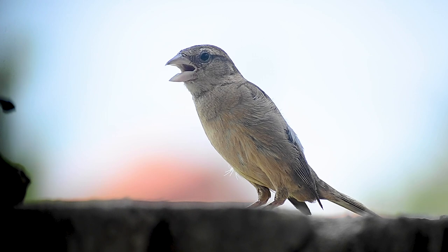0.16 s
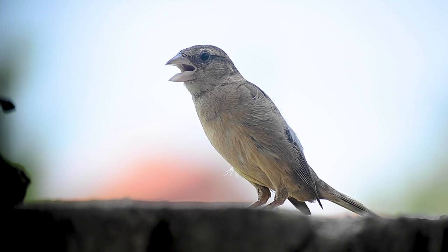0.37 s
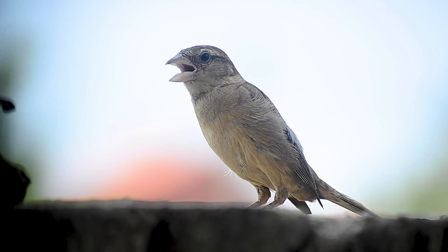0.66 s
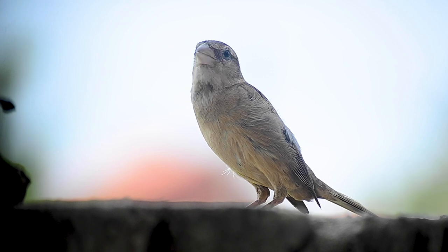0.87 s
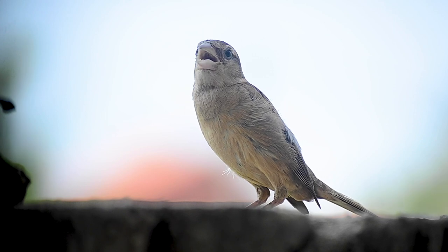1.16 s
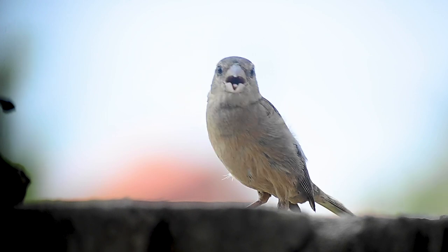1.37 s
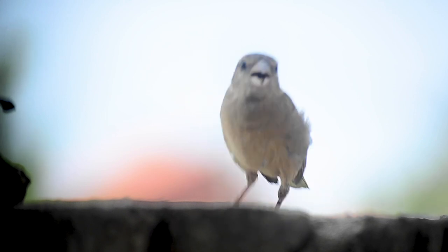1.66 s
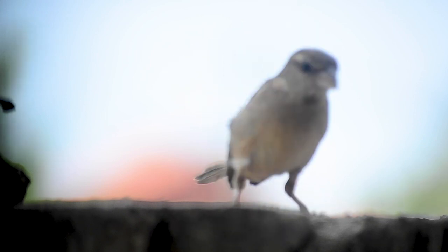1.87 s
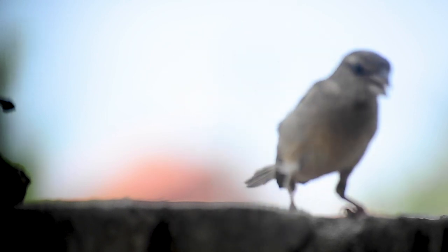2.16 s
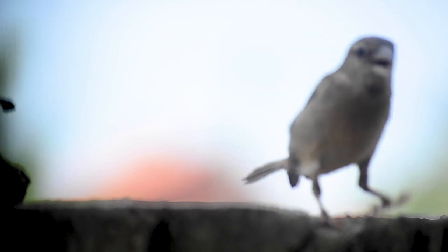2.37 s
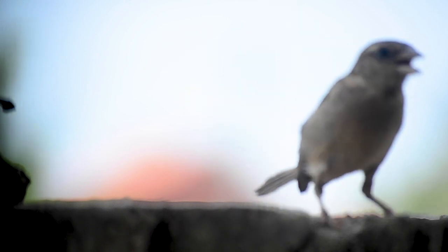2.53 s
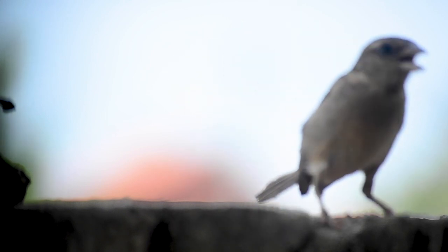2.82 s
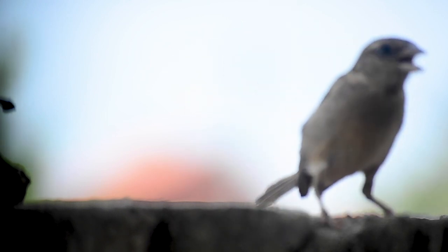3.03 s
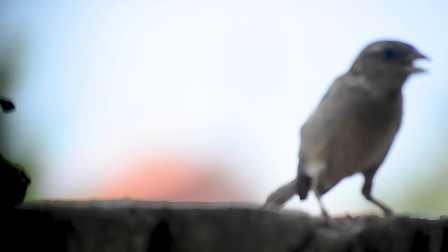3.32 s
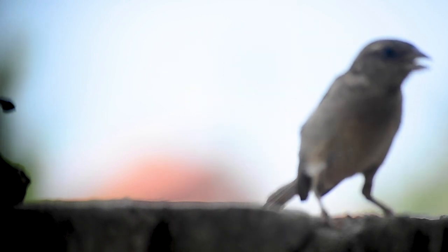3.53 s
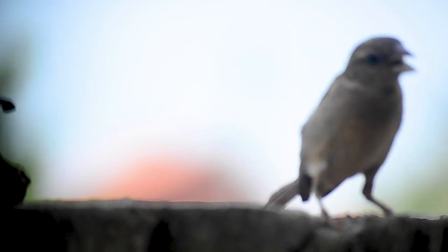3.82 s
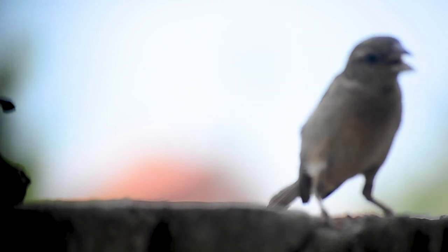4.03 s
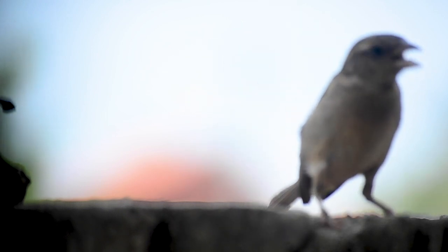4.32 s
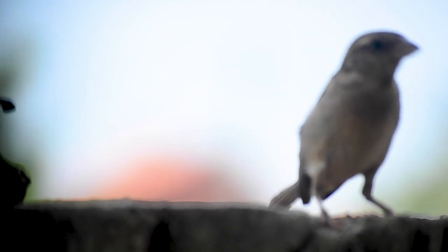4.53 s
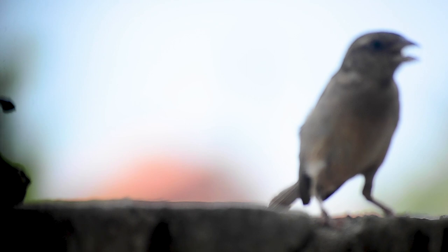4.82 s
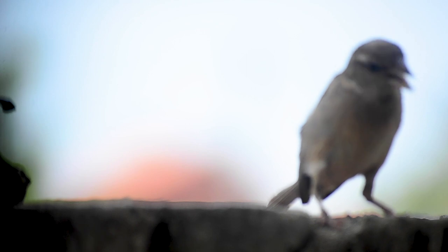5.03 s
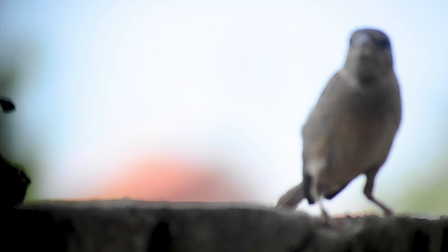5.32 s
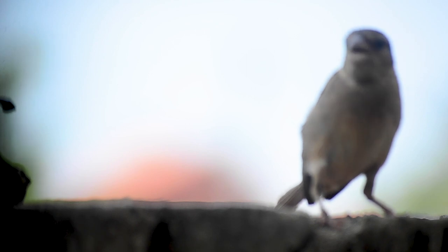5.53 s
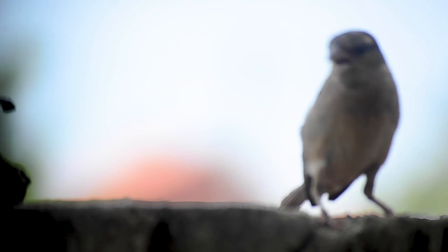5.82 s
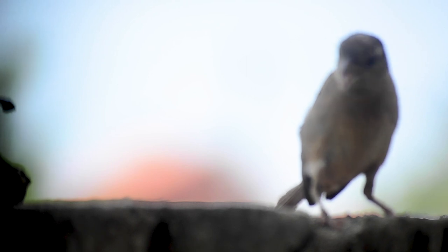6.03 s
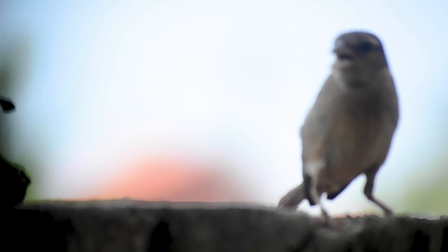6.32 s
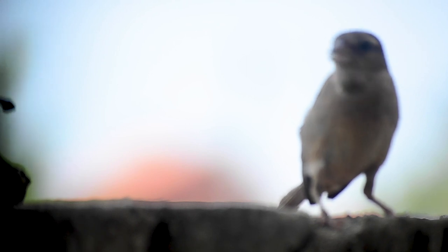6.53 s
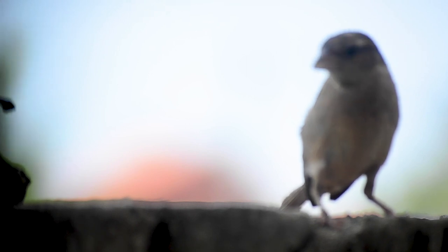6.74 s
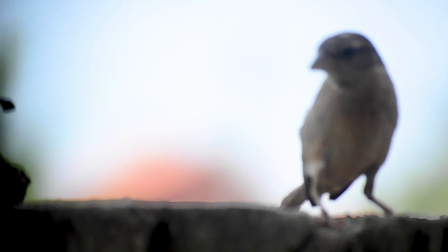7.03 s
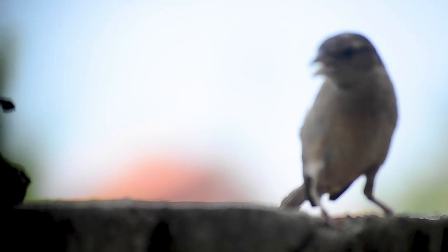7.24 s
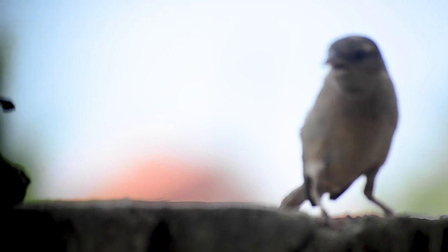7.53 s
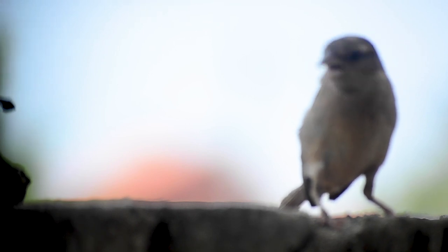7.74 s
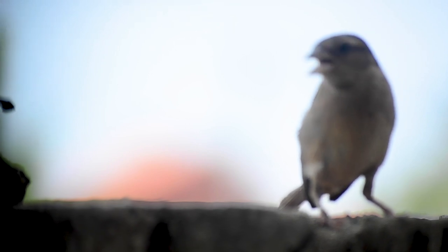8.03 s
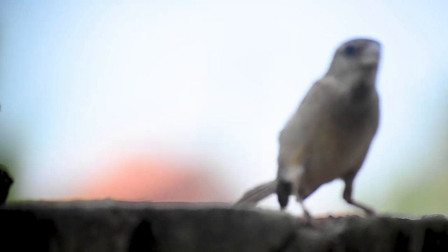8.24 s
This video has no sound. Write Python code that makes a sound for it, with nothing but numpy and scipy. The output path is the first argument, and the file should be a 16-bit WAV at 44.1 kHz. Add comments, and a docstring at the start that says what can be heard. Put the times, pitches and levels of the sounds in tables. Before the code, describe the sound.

A sparrow chirps close by outdoors, each call short, bright and buzzy. The first pair comes at about 0.8 seconds and another near 1.9, together with a small dull tap of claws landing on stone. More pairs follow around 3.4, 5.2, 6.5 and 8.2 seconds, with a single chirp at 4.5. Between these, other sparrows answer from farther away with quieter, falling, slightly echoing calls and scattered notes, while a distant flock chatters faintly, swelling and fading. A dove gives one brief soft note near 1.2 seconds and three very faint low coos between 6.9 and 7.7. A far bird adds a quick run of faint ticks around 7.7 to 8.1 seconds. Underneath throughout are a quiet, steady town rumble and a thin, wavering high drone. A few barely audible wind puffs touch the microphone from about 4 seconds on.

```python
"""A house sparrow chirps close by on a garden wall, bright and buzzy: both halves of its syrinx sound
at once, a few hundred Hz apart, and ring through throat and beak. Its claws tap the stone.
Other sparrows answer from the yards around, a far flock chatters and a dove coos softly.
A thin drone hangs in the town's rumble, and light wind puffs on the microphone ports."""
import sys
import numpy as np
from scipy import signal
from scipy.fft import rfft, irfft, next_fast_len
from scipy.io import wavfile
from scipy.ndimage import uniform_filter1d, map_coordinates

SR = 44100
rng = np.random.default_rng(int(sys.argv[2]) if len(sys.argv) > 2 else 0)


def output_pcm(signal):
    """Save a mono or channel-first signal as 16-bit PCM at the path in sys.argv[1].

    Samples are clipped to [-1, 1] before scaling.
    """
    pcm = np.clip(np.atleast_2d(signal).T, -1, 1) * 32767
    wavfile.write(sys.argv[1], SR, np.round(pcm).astype(np.int16))


N = 369558

# fader moves of the far layers: t/s, chatter level/dB, low drone level/dB, high drone level/dB
FAR_LEVELS = [(0, -67, -51.5, -51), (.3, -61.5, -62.5, -68), (1.5, -49.5, -63.5, -63),
              (2.2, -55, -61.5, -80), (3.1, -57.5, -65, -89), (3.5, -43, -57, -53), (4.05, -49.5, -62, -60),
              (4.15, -46, -64, -52), (4.7, -52.5, -61.5, -62.5), (5.5, -42.5, -59, -62),
              (5.6, -42, -56, -47.5), (6.1, -58, -58.5, -62), (6.7, -51.5, -61.5, -51.5),
              (7.55, -50.5, -55.5, -56), (7.65, -51, -83, -72), (8.38, -84, -57.5, -55)]


def amp(db):
    """Decibels to gain."""
    return 10 ** (np.asarray(db) / 20)


def unit(x):
    """Scales to rms 1."""
    return x / np.sqrt(np.mean(x ** 2) + 1e-20)


def along(points, hz):
    """Reads a curve of (f/Hz, value) points on a log frequency axis."""
    f, v = np.transpose(points)
    return np.interp(np.log(np.abs(hz) + 1), np.log(f + 1), v)


def bell(hz, centre, half_width):
    """A resonance-shaped bump of height 1."""
    return 1 / (1 + ((hz - centre) / half_width) ** 2)


def curves(rows):
    """One value per sample for each column after the time."""
    times, *columns = np.transpose(rows)
    return [np.interp(np.arange(N) / SR, times, column) for column in columns]


def wobble(rate, size=N):
    """A smooth random curve, rate knots a second."""
    knots = rng.standard_normal(int(size * rate / SR) + 4)
    return map_coordinates(knots, [np.arange(size) * rate / SR])


def filtered(x, response):
    """Shapes x with a complex frequency response."""
    size = next_fast_len(N + SR // 2)
    return irfft(rfft(x, size) * response(np.fft.rfftfreq(size, 1 / SR)), size)[..., :N]


def add(track, s, sound):
    """Mixes a sound in at s seconds."""
    at = round(s * SR)
    part = sound[..., max(-at, 0):N - at]
    track[..., max(at, 0):max(at, 0) + part.shape[-1]] += part


def rush(gain, patchy_db):
    """Stereo noise of rms 1, coloured by gain(hz) and mottled in time and frequency."""
    likeness = [(60, 0.94), (240, 0.76), (950, 0.71), (3770, 0.82), (15000, 0.12)]  # stereo image: f/Hz, left-right correlation
    spectrum = signal.stft(rng.standard_normal((2, N)), nperseg=512)[2]
    patches = uniform_filter1d(uniform_filter1d(rng.standard_normal(spectrum.shape[1:]), 6, 0), 8, 1)
    pair = signal.istft(spectrum * amp(patchy_db * unit(patches)), nperseg=512)[1][:, :N]
    width = lambda hz: np.arccos(along(likeness, hz)) / 2
    mid, side = filtered(pair, lambda hz: gain(hz) * [np.cos(width(hz)), np.sin(width(hz))])
    return unit(np.array([mid + side, mid - side]))


def echoed(sound, wet_db, alike, near_db):
    """Adds near scatter and the yard's reverb tail, where each frequency dies at its own speed."""
    decay = [(800, 0.12), (3000, 0.52), (5000, 0.33), (10000, 0.13)]  # the yard's reverb time: f/Hz, t60/s
    hz, t, spectrum = signal.stft(rng.standard_normal((2, SR // 2)), SR, nperseg=256)
    mid, side = signal.istft(spectrum * amp(-60 * t / along(decay, hz)[:, None]), SR, nperseg=256)[1]
    width = np.arccos(alike) / 2
    tail = np.cos(width) * mid + np.sin(width) * np.array([side, -side])
    impulse = amp(wet_db) * tail / np.linalg.norm(mid)
    scatter = rng.standard_normal(1500) * amp(-60 * np.arange(1500) / SR / 0.098)
    impulse[:, :1500] += amp(near_db) * scatter / np.linalg.norm(scatter)
    impulse[:, 0] += 1  # direct sound
    return signal.fftconvolve(sound[None], impulse, axes=1)


def slide(length, start_hz, end_hz, rough):
    """A gliding whistle, beaten by the bird's second voice and shaken by breath."""
    size = round(length * SR)
    u = np.arange(size) / size
    hz = start_hz * (end_hz / start_hz) ** (u ** 1.2) * (1 + 0.0948 * rough * wobble(600, size))
    phase = 2 * np.pi * np.cumsum(hz) / SR
    whistle = np.sin(phase) + amp(-33) * np.sin(2 * phase)
    beat = 2.6 * np.cos(2 * np.pi * rng.uniform(235.7, 336.0) * length * u)
    breath = 1.43 * wobble(500, size) + 0.3 * wobble(5000, size)
    envelope = np.sin(np.pi * u ** 0.56) ** 0.54 * (hz / start_hz) ** 0.5
    return envelope * unit(whistle * (1 + rough * (beat + breath)))


def town():
    """The bed: the town's steady, broad rumble."""
    colour = [(20, -4), (33, -9), (48, -2), (70, -8.5), (130, -8.5), (250, -4.5), (500, -3), (1000, -5),
              (2000, -5), (4000, -10), (5600, -15), (8400, -19), (12000, -22), (15700, -28)]  # noise spectrum: f/Hz, relative level/dB
    return amp(-55.5) * rush(lambda hz: amp(along(colour, hz)), patchy_db=1.06)


def wind():
    """Short gusts on the microphone ports puff in the bass."""
    puffs = [(3.98, -69), (4.27, -63), (4.8, -73), (6.1, -64), (8.15, -63)]  # gust peaks: t/s, level/dB
    t = np.arange(N) / SR
    gusts = sum(amp(db) * np.exp(-((t - s) / .06) ** 2) for s, db in puffs)
    return gusts * rush(lambda hz: (hz > 25) / (1 + (hz / 90) ** 3), patchy_db=2.0)


def drone():
    """A thin far drone: two narrow noise bands, each with a faint octave, wavering in level."""
    bands = [(2065, 46), (2250, 45)]  # drone pitches: f/Hz, half-width/Hz
    out = np.zeros((2, N))
    for (centre, width), db in zip(bands, curves(FAR_LEVELS)[1:]):
        band = lambda hz: bell(hz, centre, width) + amp(-9.5) * bell(hz, 2 * centre, 3 * width)
        out += amp(db + 1.5 * wobble(14)) * rush(band, patchy_db=.8)
    return out


def flock():
    """Many small far chirps at random blur into chatter."""
    chirps_per_s = 90
    chirps, chatter = np.zeros(N), np.zeros((2, N))
    for when, pitch, bend, force, span in rng.random((int(chirps_per_s * N / SR), 5)):
        hz = 2900 + 2300 * pitch
        chirp = slide(0.01415 + 0.037 * span, hz, hz * (1.1 - .3 * bend), rough=0.518)
        add(chirps, when * N / SR, amp(3.1 * force) * chirp)
    for at in range(0, N, SR // 4):  # fresh echoes every quarter second
        add(chatter, at / SR, echoed(chirps[at:at + SR // 4], wet_db=3, alike=0.45, near_db=9.5))
    return amp(curves(FAR_LEVELS)[0] - 5.0) * unit(chatter)


def ticking_bird():
    """A far bird's quick run of ticks, each two short whistles about an octave apart."""
    ticks = [(7.69, -55), (7.786, -54.5), (7.86, -58.5), (7.96, -56.5), (8.025, -56.5), (8.065, -54)]  # the run: t/s, level/dB
    out = np.zeros((2, N))
    for s, db in ticks:
        tick = slide(.022, 4750, 4340, rough=0.47) + amp(2.0) * slide(.022, 2396, 2250, rough=0.48)
        add(out, s, echoed(amp(db) * tick, wet_db=-14, alike=0.57, near_db=-6.5))
    return out


def soft_notes():
    """One short soft note near 1 kHz, then three low dove coos, each sagging slightly in pitch."""
    coos = [(1.247, 0.072, 996, -48), (6.88, 0.2, 530, -65.5), (7.29, 0.17, 503, -64),
            (7.54, .16, 482, -61.5)]  # a soft note and the dove's coos: t/s, length/s, f/Hz, level/dB
    out = np.zeros((2, N))
    for s, length, hz, db in coos:
        coo = slide(length, hz, hz * .985, rough=.2)
        add(out, s, echoed(amp(db) * coo, wet_db=-9, alike=.8, near_db=-12))
    return out


def neighbours():
    """Two sparrows each repeat a falling call among other birds' notes, all heard mostly as echoes."""
    # per sparrow: call (length/s, start f/Hz, end f/Hz, roughness 0-1),
    # thin lead-in (length/s or 0 for none, start f/Hz, end f/Hz, level/dB re call), cues (t/s, level/dB)
    answers = [((0.065, 4630, 2790, 0.44), (0, 6350, 6202, -17), [(-.07, -32.5), (1.934, -34),
               (2.507, -33.5), (3.449, -39), (4.855, -35.5), (5.503, -34), (6.766, -35.5), (7.406, -36.5)]),
               ((0.075, 4950, 3310, .5), (0.07, 7000, 5700, -19.5), [(1.186, -41), (4.335, -40),
               (6.269, -41.5)])]
    # stray single notes: t/s, length/s, start f/Hz, end f/Hz, level/dB, roughness 0-1
    notes = [(0.201, 0.032, 4700, 4200, -55.5, .4), (1.161, 0.032, 4120, 5540, -44, .4),
             (1.256, 0.095, 5330, 3820, -49.5, 0.96), (1.329, 0.03, 3995, 5150, -42.5, .25),
             (1.363, 0.0228, 4810, 3580, -44, 0.68), (1.42, 0.048, 3324, 4590, -45, 0.44),
             (1.58, 0.014, 3520, 3290, -48, 0.52), (1.654, 0.016, 4900, 3210, -48, 0.75),
             (1.77, 0.015, 3530, 3410, -48.5, 0.57), (2.339, 0.027, 4330, 3300, -49.5, 0.85),
             (2.972, 0.031, 3725, 3430, -54, 0.65), (3.66, .018, 3720, 3760, -49, 0.25),
             (4.089, 0.0049, 3300, 2360, -47, 0.6), (4.791, 0.055, 3630, 3100, -47.5, 0.52),
             (4.975, 0.074, 5440, 3780, -48, 0.85), (5.05, 0.026, 3560, 4420, -40, 0.22),
             (5.588, 0.065, 3620, 4820, -46, 0.78), (5.994, 0.074, 5310, 3500, -56, 0.35),
             (6.602, 0.057, 3980, 3650, -43.5, .5), (6.664, 0.045, 3040, 4000, -43, 0.3),
             (7.228, .065, 3750, 2720, -58, 0.2), (8.109, 0.044, 6400, 6100, -56, .5),
             (8.135, 0.027, 4220, 5500, -44.5, 0.3)]
    out = np.zeros((2, N))
    far = lambda db, *note: echoed(amp(db) * slide(*note), wet_db=-3.0, alike=1.0, near_db=4.0)
    for (call, (*lead, lead_db), cues), lead_s in zip(answers, (.016, .04)):
        for s, db in cues:
            add(out, s, far(db, *call))
            add(out, s - lead_s, far(db + lead_db, *lead, call[-1]))
    for s, *note, db, rough in notes:
        add(out, s, far(db, *note, rough))
    return out


def claws():
    """Claws land on stone, each tap one dull push."""
    taps = [(1.8726, -9), (1.8769, -21), (5.069, -20)]  # pushes before filtering: t/s, level/dB
    pushes = np.zeros(N)
    for s, db in taps:
        pushes[round(s * SR)] = amp(db)
    thud = lambda hz: 6 * (1j * hz / 110 / (1 + 1j * hz / 110)) ** 2 / (1 + 1j * hz / 1300) ** 3
    return filtered(pushes, thud)


def voice_pitch(u, top_hz, fall, peak, rise):
    """One half of the syrinx arches up to top_hz at u = peak and drops; u runs 0-1 over the chirp."""
    drop = np.where(u < peak, rise * np.abs(u / peak - 1) ** 2.2,
                    fall * np.abs((u - peak) / (1 - peak)) ** 2.2)
    shaky = 0.0091 + 0.0535 * (2 * u - 1) ** 4  # the membranes are unsteady as they start and stop
    return top_hz * np.exp(-drop) * (1 + shaky * wobble(897.0, len(u)))


def facing_db(hz, turned):
    """The call's colour depends on which way the bird faces."""
    sides = [(7550, 10.5, -7), (6560, 6, -1)]  # before and after it turns: upper resonance f/Hz, lift/dB, hollow/dB
    upper_hz, upper_db, hollow_db = sides[turned]
    sheen_db = -2 if turned else 3
    return (upper_db * bell(hz, upper_hz, 410) + hollow_db * bell(hz, 2980, 380)
            + sheen_db * bell(hz, 12500, 1200))


def sparrow():
    """Two pulse trains multiply: sums and differences of their harmonics ring through throat and beak."""
    # close chirps: t/s, length/s, level/dB, low voice's top f/Hz, high voice's top f/Hz,
    # fall in log pitch, throat resonance f/Hz, its lift/dB, treble/dB
    chirps = [(0.758, 0.072, -21.5, 1360, 1706, .52, 4940, 12.5, -1.5),
              (0.88, 0.09, -19.5, 1587, 1921, 0.82, 4780, 15, -2.5),
              (1.843, 0.067, -23.5, 1351, 1639, 0.61, 4460, 24, 2.5),
              (1.99, 0.08, -19.5, 1505, 1808, 0.76, 4700, 17, -1.5),
              (3.323, 0.06, -25, 1280, 1556, 0.58, 4530, 17.5, 3),
              (3.415, 0.082, -24.5, 1399, 1736, 0.24, 4080, 18, -2),
              (4.467, 0.076, -23.5, 1376, 1681, 0.58, 4520, 18, -1.5),
              (5.072, 0.078, -22.5, 1340, 1630, 0.5, 4540, 14.5, 1),
              (5.258, 0.085, -22, 1460, 1702, .8, 4430, 20.5, -2),
              (6.456, 0.055, -22.5, 1319, 1615, 0.57, 4850, 21.5, 0.5),
              (6.548, 0.065, -22, 1493, 1790, 0.66, 4440, 21.5, -1),
              (8.17, 0.061, -20.5, 1358, 1615, 0.48, 4720, 19, 1.5),
              (8.257, 0.064, -21.5, 1429, 1715, 0.39, 4150, 16.5, -3.5)]
    low_voice = [4, -1, -12.5, -13.5, -16.5, -19.5, -8, -17, -3.5, -7]  # lower pulse train, from harmonic 0 up: level/dB
    high_voice = [6, 1, -4, -10, -12, -18, -22, -18, -32, -1.5]  # higher pulse train, from harmonic 0 up: level/dB
    beak = [(500, -75), (800, -8.5), (1500, -7.5), (2300, -9), (3300, -11), (5200, -6.5), (6500, -12),
            (8000, -24.5), (9900, -33.5), (11200, -29), (13000, -35.5), (15700, -50)]  # the beak's tone curve: f/Hz, level/dB
    turn_s = 1.95  # the bird lands from a hop facing the other way
    sink_per_s = 5.55  # share of the throat's resonance frequency lost as the beak closes
    bass_cut_hz = 617  # the chirps carry little below this
    m, n = (k.ravel()[:, None] for k in np.mgrid[-9:10, -9:10])  # harmonic numbers of the two voices
    order = abs(m) + abs(n)
    pair_db = np.take(low_voice, abs(m)) + np.take(high_voice, abs(n)) - 6 * (m * n < 0) - 3 * (m * n > 0)
    pair_db -= 3 * (m * n == 0) * np.maximum(m + n - 3, 0)  # pure harmonics recede high up
    # partials of equal m + n beat together; the groups are out of step
    phase = rng.uniform(0, 2 * np.pi, 37)[m + n] + .4 * rng.standard_normal(m.shape)
    out = np.zeros((2, N))
    for s, length, db, low_hz, high_hz, fall, resonance_hz, lift_db, bright_db in chirps:
        u = np.arange(round(length * SR)) / (length * SR)
        low = voice_pitch(u, low_hz, fall, peak=.47, rise=.51)
        high = voice_pitch(u, high_hz, fall, peak=.43, rise=.47)
        hz = m * low + n * high
        cycles = np.cumsum(hz, axis=1) / SR + m * rng.random() + n * rng.random()
        drift = np.cumsum(uniform_filter1d(rng.standard_normal(hz.shape), size=30, axis=1), axis=1)
        cycles += 2e-5 * order ** 3 * drift  # high partials blur
        effort = np.sin(np.pi * u ** 0.73) ** 0.72
        throat_hz = resonance_hz * (1 - sink_per_s * length * np.clip(u - .25, -.16, .7))
        throat = 1 + effort ** 0.82 * amp(lift_db) * bell(hz, throat_hz, 600)
        shelf = np.clip(np.log2(np.abs(hz) / 5600 + 1e-9) * 3, 0, 1)
        treble_db = shelf * (bright_db + 6.5 - 14 * u ** 1.64 - 10 * (1 - effort) ** 2)
        vary_db = np.minimum(order, 4) / 2 * rng.standard_normal(m.shape)
        partial_db = pair_db + along(beak, hz) + treble_db + facing_db(hz, s > turn_s) + vary_db
        gain = throat * amp(partial_db) * (hz > 0) * (hz < SR / 2)
        tone = (gain * np.cos(2 * np.pi * cycles + phase)).sum(axis=0)
        tone *= 1 + 0.033 * wobble(1478, len(u))  # breath roughens every pulse
        add(out, s, echoed(amp(db - 2.5) * effort * tone, wet_db=-23.5, alike=1.0, near_db=-19))
    return filtered(out, lambda hz: 1 - 1 / (1 + (hz / bass_cut_hz) ** 8))


def scene():
    """The single birds sit just right of centre, over flock, drone, wind and town."""
    left_lag_s = 2.1e-5
    birds = sparrow() + neighbours() + soft_notes() + ticking_bird() + claws()
    lag = lambda hz: np.exp(1j * np.pi * hz * left_lag_s * np.array([[-1], [1]]))
    return filtered(birds, lag) + flock() + drone() + wind() + town()


def record(dry):
    """The shell around the microphone ports notches two narrow bands; nothing passes above top_hz."""
    notches = [(5660, 153, 0.72), (6940, 62, 0.7)]  # shell cancellations: f/Hz, half-width/Hz, depth 0-1
    top_hz = 15770
    shell = lambda hz: np.prod([1 - depth * bell(hz, f, width) for f, width, depth in notches], axis=0)
    return filtered(dry, lambda hz: shell(hz) * (hz < top_hz))


dry = scene()
out = record(dry)
output_pcm(out)
```